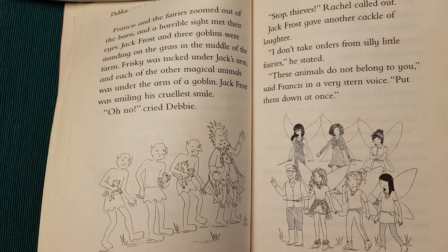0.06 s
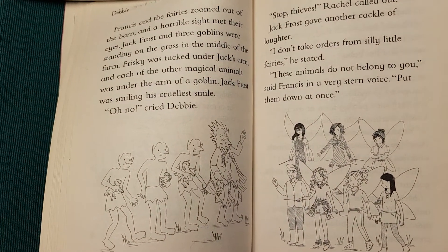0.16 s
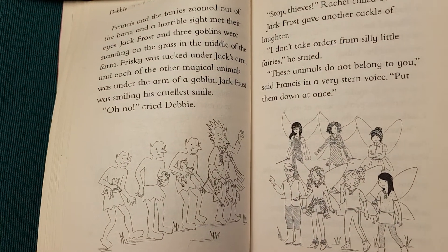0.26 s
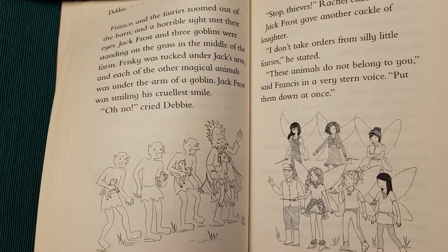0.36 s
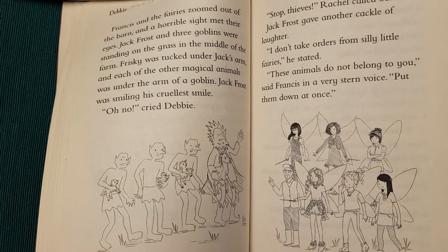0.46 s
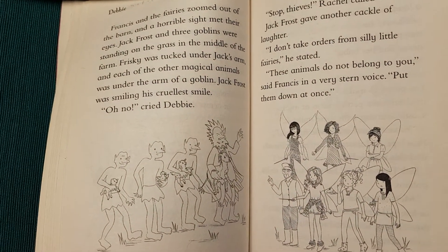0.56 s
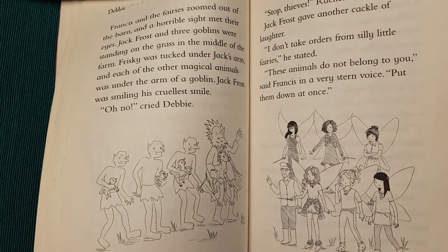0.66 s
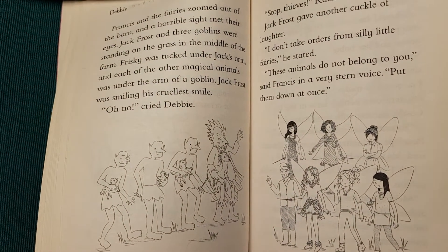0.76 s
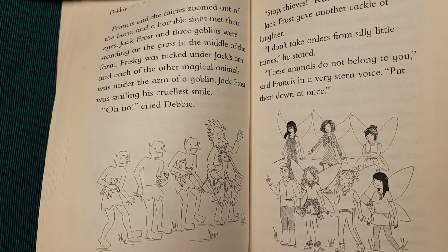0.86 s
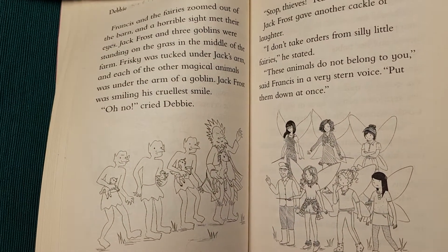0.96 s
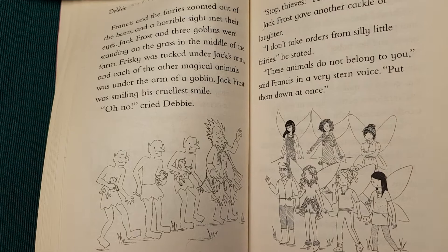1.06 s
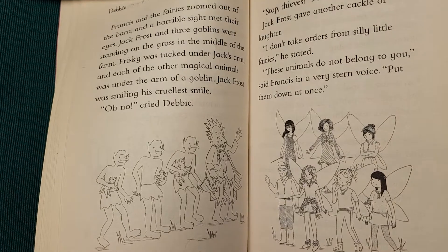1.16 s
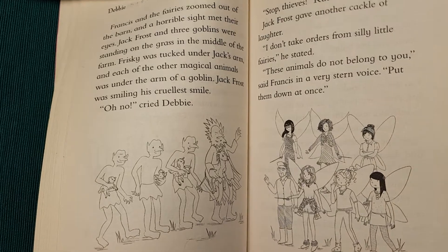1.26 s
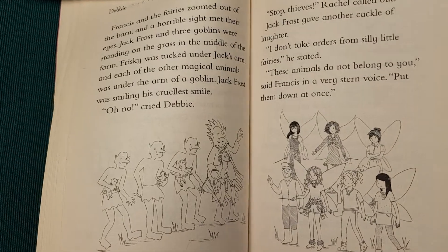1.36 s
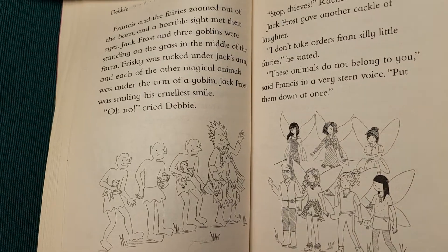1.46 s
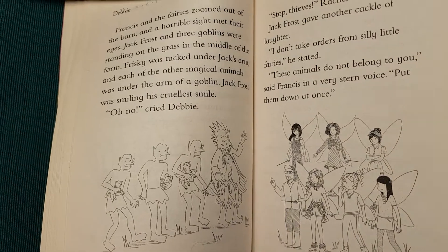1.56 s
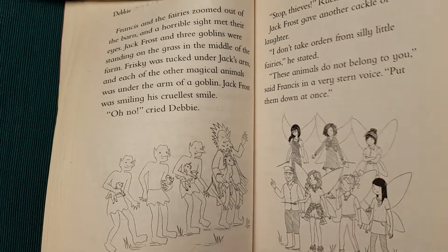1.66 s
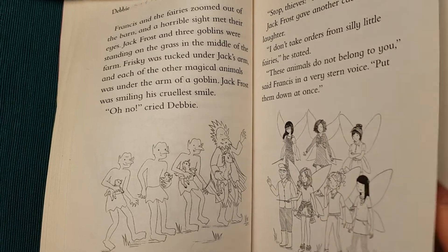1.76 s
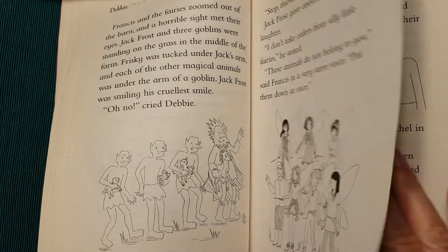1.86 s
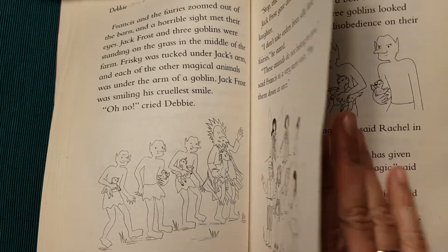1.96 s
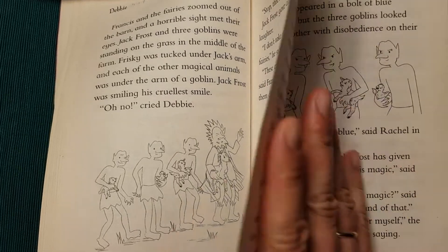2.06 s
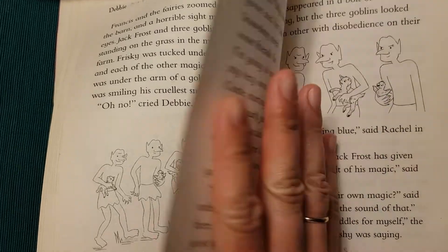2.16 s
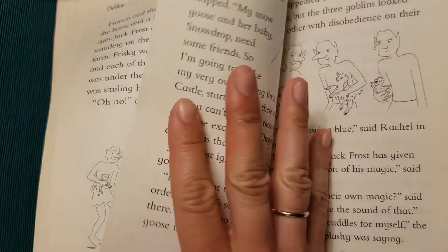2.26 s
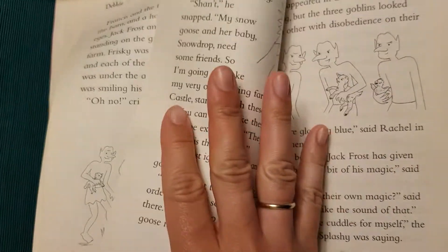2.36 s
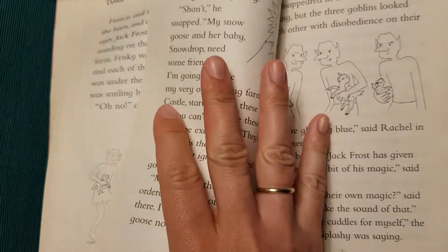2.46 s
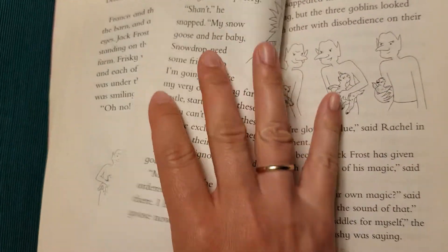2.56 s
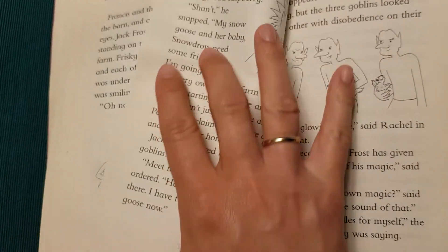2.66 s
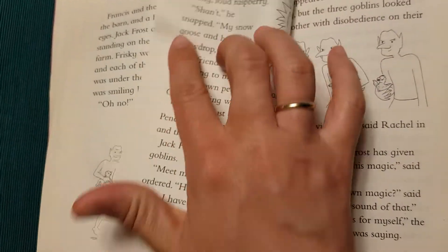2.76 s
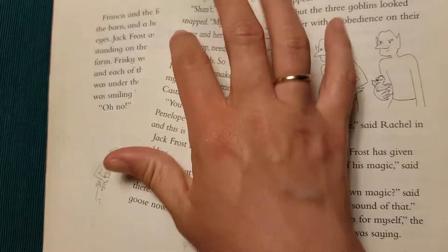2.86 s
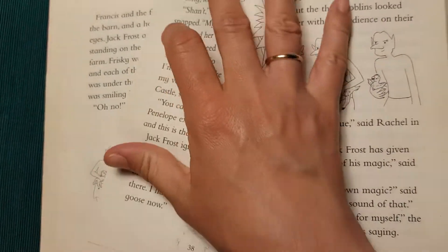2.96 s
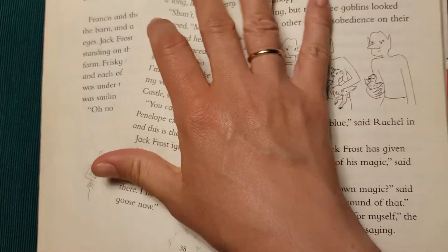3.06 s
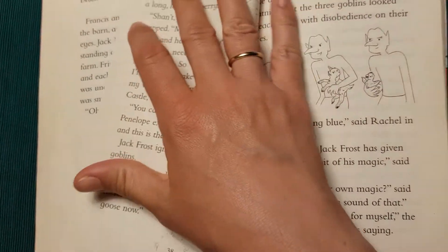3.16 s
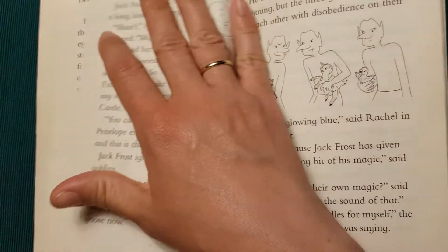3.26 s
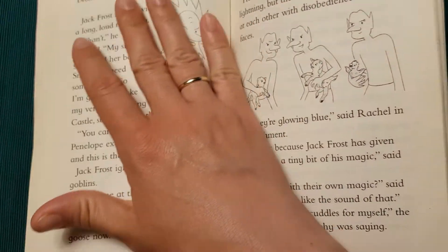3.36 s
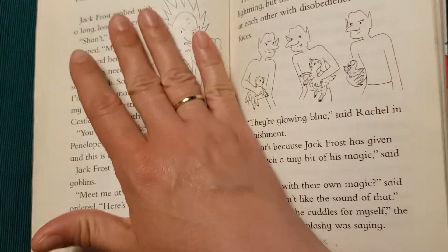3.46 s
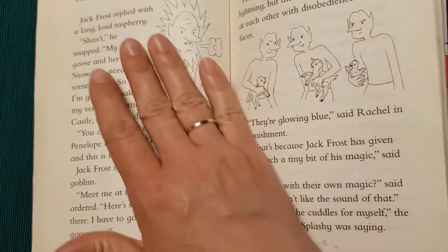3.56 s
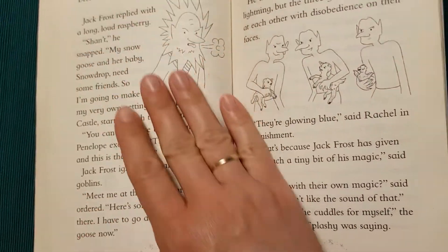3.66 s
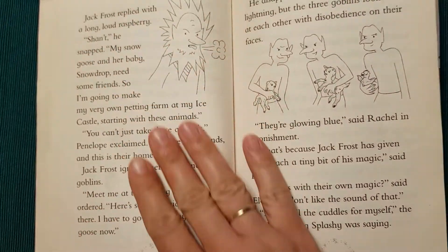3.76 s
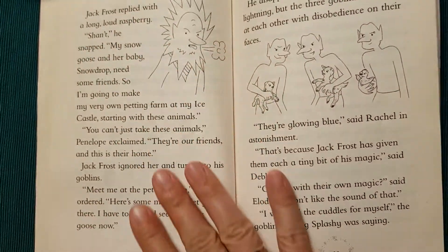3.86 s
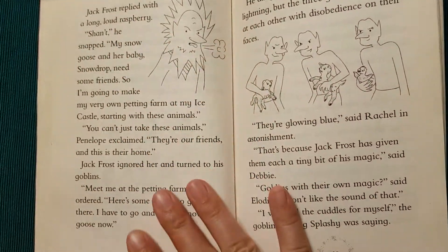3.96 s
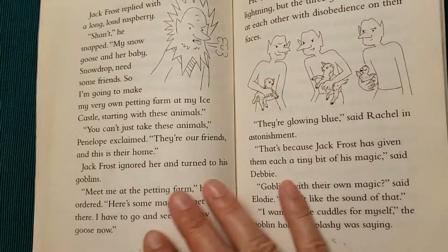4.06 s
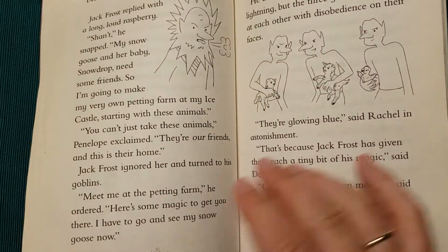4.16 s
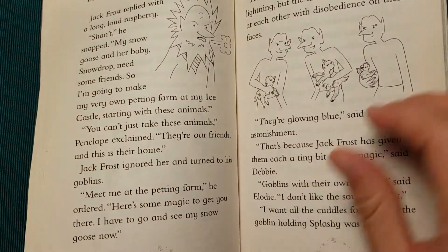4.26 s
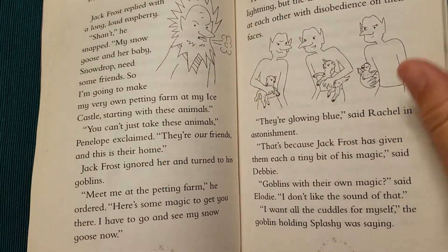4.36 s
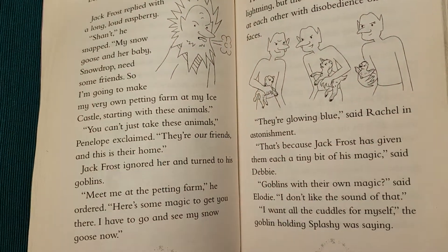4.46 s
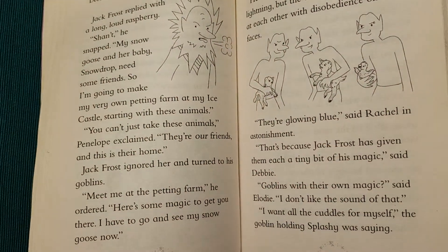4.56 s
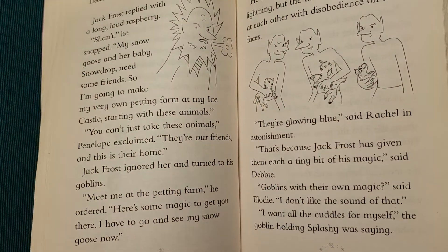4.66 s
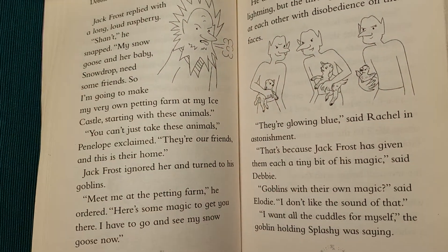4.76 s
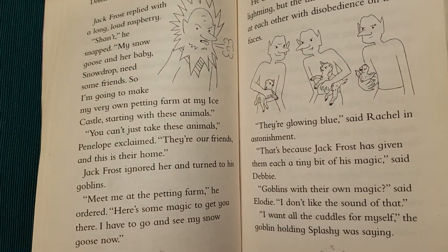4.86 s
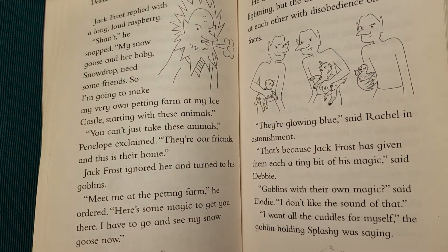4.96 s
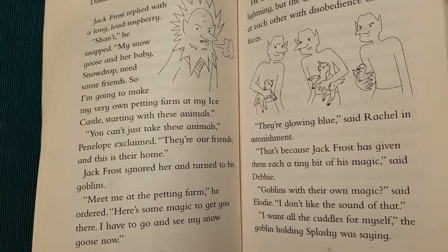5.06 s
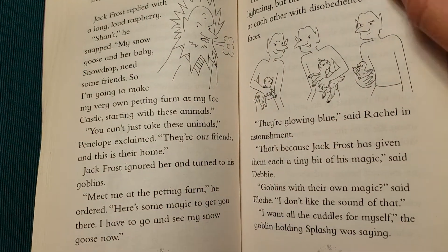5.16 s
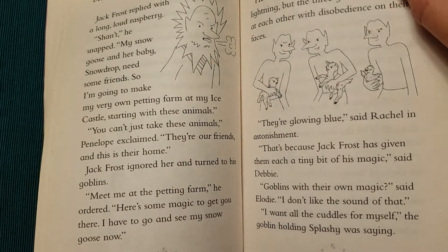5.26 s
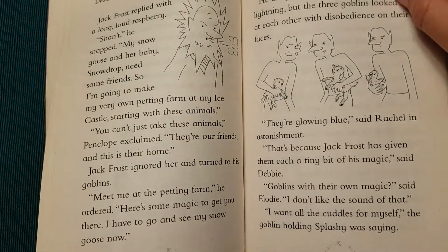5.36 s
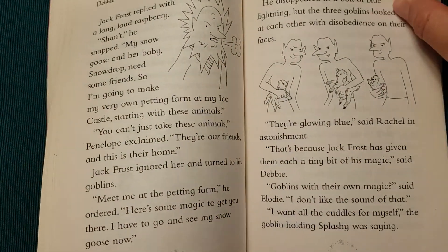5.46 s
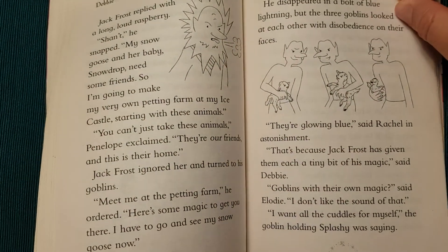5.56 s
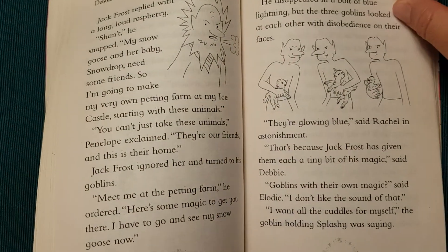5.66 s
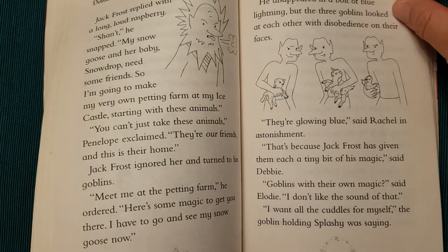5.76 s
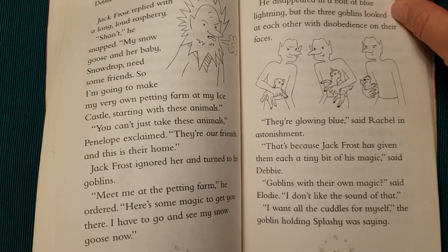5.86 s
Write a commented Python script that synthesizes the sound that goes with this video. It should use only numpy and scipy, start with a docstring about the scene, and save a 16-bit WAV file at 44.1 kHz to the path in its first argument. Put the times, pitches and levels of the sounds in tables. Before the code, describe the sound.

Close dry paper rustling: fingers scuff a page corner, flip the sheet with sharp crackles, stroke it flat, then fumble the next corner.

```python
"""Friction of a hand on a paperback page: lifted by its corner, turned, pressed down, stroked flat.
Skin hiss, fingertip scuff, sheet rustle and air-pocket whoosh are grainy noise in narrow bands.
Slips are noise bursts, snaps are ringing sheet modes, book thuds are sagging sines, the waft is
low noise. Mains hum is sines; rumble and microphone hiss are coloured noise.
Heard by a close pair of small microphones in a quiet room."""
import sys
import numpy as np
from scipy import signal
from scipy.fft import rfft, irfft
from scipy.io import wavfile

SR = 44100
rng = np.random.default_rng(int(sys.argv[2]) if len(sys.argv) > 2 else 0)


def wrap_up_sound(samples):
    """Save the sound to the file named by the first command line argument, as 16-bit audio."""
    columns = np.atleast_2d(samples).T
    # keep every value between -1 and 1, then stretch to whole-number steps
    tamed = np.clip(columns, -1, 1)
    steps = np.round(tamed * 32767).astype(np.int16)
    wavfile.write(sys.argv[1], SR, steps)


N = 260631

# separate touches at the page corner: (time of full strength [s], rise [s], hold [s], fall [s],
# rustle [dB], skin [dB], scuff [dB], air pocket [dB])
TOUCHES = [(0.092, .005, 0.004, 0.15, -66, -91, -67.5, -82),
           (0.384, 0.093, .003, 0.083, -70, -71, -66.5, -87),
           (0.443, 0.036, 0.09, 0.06, -77.5, -75, -71, -95),
           (0.737, 0.094, 0.14, 0.11, -65, -71.5, -80, -81.5), (0.8, 0.12, .003, 0.12, -58, -79, -89, -91),
           (1.296, 0.041, 0.07, 0.045, -49, -58, -51.5, -67),
           (1.395, 0.022, 0.0033, 0.01, -56, -53.5, -48, -85),
           (1.41, 0.012, 0.012, 0.027, -50, -59, -56, -65.5),
           (1.443, 0.019, 0.0024, 0.055, -50, -55, -54, -79),
           (1.462, .01, 0.0076, 0.0096, -56, -76, -73, -60),
           (1.48, 0.0077, 0.0021, 0.0063, -67, -58, -53, -76),
           (1.57, 0.024, .003, 0.11, -52.5, -58, -56, -77),
           (1.639, 0.0061, 0.0079, 0.022, -46.5, -49, -48.5, -77),
           (1.661, 0.047, .003, 0.11, -48.5, -52, -52.5, -61),
           (1.766, .01, 0.026, .05, -56.5, -60.5, -65, -72),
           (1.825, 0.039, 0.016, 0.06, -45.5, -47, -49.5, -66),
           (4.249, 0.0054, 0.043, 0.075, -62, -55.5, -63, -90),
           (4.755, 0.24, 0.0028, 0.085, -71, -60.5, -72, -78.5),
           (5.205, 0.0056, 0.023, .03, -67, -65.5, -66.5, -83.5),
           (5.225, 0.018, 0.0032, 0.033, -53.5, -56, -53, -85),
           (5.274, 0.025, 0.0024, 0.071, -47.5, -48, -50, -72),
           (5.334, 0.072, 0.037, 0.015, -55.5, -51, -55, -78),
           (5.432, 0.19, .003, 0.62, -57, -60, -66, -66.5),
           (5.509, 0.027, 0.07, 0.084, -51, -55.5, -61, -61),
           (5.64, 0.027, 0.14, 0.03, -63, -67.5, -80, -96),
           (5.74, 0.041, 0.047, 0.021, -62, -82, -72.5, -91)]
EDGE_DB = 20   # gained over a rise, lost over a fall
# hand carries the page over, presses and strokes it: (time [s], rustle [dB], skin [dB], air pocket [dB])
STROKE = [(1.86, -100, -100, -110), (1.9, -57, -56, -95), (1.926, -52.5, -53, -44),
          (2.051, -51, -50.5, -115), (2.054, -49, -48, -53), (2.13, -50.5, -49.5, -71.5),
          (2.225, -48.5, -51, -68), (2.325, -53.5, -62.5, -70), (2.355, -45, -52, -55),
          (2.415, -39.5, -46, -59), (2.464, -38, -43.5, -49.5), (2.55, -41, -43, -53),
          (2.576, -36.5, -40, -46.5), (2.604, -45.5, -51, -56), (2.684, -46.5, -51, -64),
          (2.73, -37, -47, -55.5), (2.79, -36, -45, -58), (2.834, -31, -42, -50), (2.933, -43.5, -51, -65),
          (3.033, -41, -48.5, -53.5), (3.053, -50, -51.5, -47.5), (3.073, -40, -44, -61),
          (3.193, -42.5, -46.5, -46.5), (3.362, -38, -39.5, -60), (3.402, -51.5, -51.5, -56.5),
          (3.472, -53, -52.5, -70), (3.632, -50, -44.5, -61.5), (3.71, -46.5, -45.5, -62),
          (3.831, -44.5, -42.5, -52), (3.931, -49, -47.5, -63.5), (4.041, -60, -60.5, -77),
          (4.141, -54, -50.5, -66), (4.243, -65.5, -69, -76), (4.28, -99, -110, -100)]
# scuff during the stroke: (time [s], level below skin [dB])
SCUFF_UNDER_SKIN = [(1.95, 2.8), (2.2, 5.3), (2.57, 4.4), (2.7, 4.7), (2.83, 1.9), (3.0, 3.5), (3.3, 5),
                    (3.45, 5.4), (3.65, 6.4), (3.85, 5.1), (4.15, 7.8)]
# hand at rest on the book: (rustle [dB], skin [dB], scuff [dB], air pocket [dB])
RESTING_DB = (-91.5, -83.5, -95.5, -105)
# skin hiss spectrum: (frequency [Hz], relative density [dB])
SKIN_SPECTRUM = [(5000, -46.5), (7600, -19), (9500, 1.5), (11500, -2), (13500, -6), (16000, 1.5)]
# fingertip scuff spectrum before pitch shift: (frequency [Hz], relative density [dB])
SCUFF_SPECTRUM = [(2000, -32), (3600, -19.5), (4300, 1.5), (5300, 6), (6500, -1), (8000, -3), (11000, -20)]
# scuff starts higher and settles lower: (time [s], frequency factor [1])
SCUFF_PITCH = [(0.55, 1.15), (1.2, 1.033), (4.4, 1.01), (5.2, 1)]
# sheet rustle spectrum: (frequency / centre [1], density before focus factor [dB])
RUSTLE_SPECTRUM = [(.3, -39), (.48, -10.5), (.6, -4.5), (.85, -2), (1.2, -3.5), (1.6, -5), (2.6, -22)]
# bend of the sheet moves the rustle: (time [s], centre [Hz], focus factor on the spectrum dB [1])
BEND = [(0.1, 2320, 1.1), (0.6, 2230, 1.2), (0.72, 3540, 1.9), (0.9, 3500, 2.6), (1.2, 2500, 1.6),
        (1.5, 1960, 1.05), (1.65, 3100, 1.8), (1.8, 2300, 1.65), (2.2, 2500, 0.99), (2.4, 2600, 1.34),
        (2.5, 2280, 0.83), (2.65, 1840, 0.72), (2.78, 1990, 2.66), (2.9, 2030, 2.4), (3.1, 2070, 0.71),
        (3.22, 1880, 1.12), (3.3, 2290, 1.2), (3.39, 2650, 0.69), (3.55, 2980, 1), (3.85, 2360, 2.56),
        (4.05, 2360, 1.94), (4.2, 2980, 1.4), (4.29, 2125, 0.59), (4.75, 1850, 0.85), (5.25, 2326, 1.75),
        (5.5, 2190, 1.3), (5.7, 2100, 2.9)]
# air pocket under the sheet: (frequency [Hz], relative density [dB])
POCKET_SPECTRUM = [(250, -20), (450, -21), (620, -8), (850, -1), (1050, 1.5), (1250, -11), (1600, -27.5)]
# uneven catching of the contact: (time [s], exponent on grain and factor on flicker dB [1])
CATCH = [(1.2, 1.65), (1.9, 0.82), (2.3, 0.83), (2.5, 2.05), (3.35, 1.07), (3.5, 0.7), (4.2, 0.73),
         (5.2, 0.88)]
# hand at the far corner shades the treble: (time [s], slope above 10 kHz [dB/octave])
REACH = [(4.4, -5.5), (5.1, -39.5)]
# left-right likeness of the friction: (frequency [Hz], likeness [1])
LIKENESS = [(300, 0.93), (1000, 0.83), (2000, 0.62), (4000, 0.11), (8000, 0.25), (16000, 0.19)]
# hand position: (time [s], left-right level difference before any SHADOW or lean factor [dB])
SIDEWAYS = [(0.0, 7), (1.12, 6), (2.06, 7.5), (2.45, 5.5), (2.78, 4), (3.15, 5), (3.4, 4), (3.57, 10.5),
            (3.9, 6.5), (4.1, 11.5), (4.4, 8), (5.05, 11), (5.91, 5.5)]
# (frequency [Hz], share of the left-right dB applied [1])
SHADOW = [(300, -1.5), (1000, 0.6), (2000, 1.31), (4000, 0.69), (8000, 0.5), (13000, 0.24)]
# sudden slips of fingers and flaps of the sheet: (time [s], level [dB], centre [Hz], t60 [s])
SLIPS = [(1.414, -46.5, 353, 0.26), (1.554, -47, 5500, 0.053), (1.829, -43.5, 450, 1),
         (1.92, -37.5, 495, 0.13), (2.0518, -33.5, 700, 0.047), (2.052, -26, 6500, 0.051),
         (2.343, -37, 385, 0.45), (2.461, -39, 563, 0.19), (2.593, -43, 347, 0.28),
         (2.941, -29, 293, 0.058), (5.196, -43.5, 3040, 0.052), (5.622, -37.5, 1700, 0.039)]
# buckling of the bent sheet: (time [s], level [dB], fold centre [Hz], fold width [octaves],
# factor on mode t60 [1])
SNAPS = [(0.094, -45, 3600, 1.1, 1.3), (0.899, -50, 6500, 0.48, 1.1), (1.246, -47.5, 6500, 0.84, 0.27),
         (2.0539, -37, 2970, 2.2, 0.59), (2.454, -31, 1500, 1, 1.5), (2.458, -12, 1060, 0.45, 0.78),
         (2.461, -28, 1050, 2.6, 0.32), (2.591, -19.5, 1280, 6.7, 0.43), (2.9414, -9.5, 3000, 1.01, 0.28),
         (3.1841, -18, 2600, 0.95, 2.2), (3.184, -20.5, 3800, 0.55, 0.6), (4.2484, -62, 8000, 1.4, 0.84),
         (5.1975, -50, 3500, 1.6, 0.83)]
# modes of the sheet: (frequency [Hz], relative level [dB], t60 before stretch [s])
SHEET_MODES = [(450, -7.5, 0.015), (814, -1, 0.019), (1374, 0, 0.031), (1874, 7.5, 0.0088),
               (2750, 10, 0.0069), (3985, 2, 0.005), (4860, -0.5, 0.015), (6100, 4.5, 0.0076),
               (8750, -9.5, 0.028), (12740, -13.5, .005)]
GIVE_S = 0.00035   # time constant of the fold giving way
SNAP_LEAN = 1.4   # snaps lie further to the side than the hand
# bounce off the open book cancels a band
DIP_HZ, DIP_WIDTH_HZ = 1180, 530
# more so once the page lies flat: (time [s], share cancelled [1])
FLAT = [(3.3, 0.4), (3.45, 0.73)]
# resonances of open book and space before the microphones: (frequency [Hz], width [Hz],
# mean lift before LOOSE factor [dB])
BOOK_RESONANCES = [(868, 91, -1), (1360, 190, 4.5), (1946, 100, 2), (2560, 260, 1.5), (3206, 150, 2),
                   (5150, 410, 1.5), (5900, 320, 0), (6810, 448, 3.4), (10970, 1060, 2)]
# book resonances weakest in the first touches, strongest in the last: (time [s], factor on lift [1])
LOOSE = [(1.8, 1), (2.0, 1.5), (4.4, 1.2), (5.1, 1.7)]
WANDER_DB, WANDER_HZ = 1.5, 7   # random spread of each lift, and its rate
NEAR_T60_S, NEAR_DB = .04, -17   # reflections from book, hand and table
# shifts of the book on its support: (time [s], level [dB], settled pitch [Hz], t60 [s])
THUDS = [(1.83, -47, 75.4, 0.17), (1.918, -35.5, 198, 0.026), (2.456, -40, 146, 0.08),
         (2.591, -38, 93, 0.054), (4.667, -56.5, 310, 0.11), (4.681, -27.5, 85, 0.023),
         (4.749, -57, 309, 0.2), (4.764, -33.5, 89, 0.04)]
SAG, SAG_S = 0.35, 0.0057   # share above settled pitch at the start; time constant
# air pushed by the turning page: (time [s], level [dB])
WAFT = [(1.2, -93), (1.8, -61.5), (2.2, -71.5), (2.6, -62), (3.1, -77)]
# mains lines: (frequency [Hz], mean level before pan [dB rms], waver [dB])
HUM = [(119.9, -53.5, 0.33), (238.8, -77, 2.5)]
HUM_PAN_DB, LEFT_LAG_S = -3.5, .0001
# room rumble: (frequency [Hz], relative density [dB])
RUMBLE_SPECTRUM = [(15, -29.5), (30, -8), (60, 2), (100, 2.5), (200, -5.5), (310, -8.5), (420, -28.5),
                   (700, -45.5)]
RUMBLE_DB = -64
# microphone hiss before the cutoff: (frequency [Hz], relative density [dB])
HISS_SPECTRUM = [(400, 4.5), (2000, -4), (5000, -7), (7700, -29.5), (11000, -0.5), (13000, 1.5), (16000, 4)]
HISS_DB = -68.5
CUTOFF_HZ = 15800


def amp(db):
    """dB to gain."""
    return 10 ** (np.asarray(db) / 20)


def rms_one(x):
    """Scale to rms 1."""
    return x / np.sqrt(np.mean(x ** 2) + 1e-20)


def at_hz(points, hz):
    """Read a spectrum on a log-frequency axis."""
    table = np.array(points)
    return np.interp(np.log(hz), np.log(table[:, 0]), table[:, 1])


def in_time(rows):
    """Table columns at every sample."""
    s, *columns = np.transpose(rows)
    return [np.interp(np.arange(N) / SR, s, c) for c in columns]


def drift(rate_hz):
    """Slow random curve of rms 1: noise at every 40th sample through a double one-pole low-pass."""
    r = np.exp(-80 * np.pi * rate_hz / SR)
    noise = rng.standard_normal(N // 40 + 2002)
    slow = signal.lfilter([1], [1, -2 * r, r * r], noise)[2000:]   # drop the settling
    return np.interp(np.arange(N) / 40, np.arange(len(slow)), rms_one(slow))


def pair(alike):
    """Two channels of white noise with the given likeness."""
    mid, side = rng.standard_normal((2, N))
    alike = np.clip(alike, 0, 1)
    return np.sqrt(.5 + .5 * alike) * mid + np.sqrt(.5 - .5 * alike) * side * [[1], [-1]]


def coloured(x, spectrum):
    """Steady noise given a spectrum; rms 1."""
    hz = np.maximum(np.fft.rfftfreq(N, 1 / SR), 1)
    return rms_one(irfft(rfft(x) * amp(at_hz(spectrum, hz)), N))


def placed(x, pan_db):
    """Level difference across the pair; the left microphone hears it a little later."""
    left, right = np.broadcast_to(x, (2, N))
    left = np.interp(np.arange(N) - round(LEFT_LAG_S * SR), np.arange(N), left)
    return np.array([left * amp(pan_db / 2), right * amp(-pan_db / 2)])


def shadow(hz, pan_db):
    """Left and right gains: the level difference depends on frequency."""
    return amp(at_hz(SHADOW, hz) * pan_db / 2 * np.array([[1], [-1]]))


def hand():
    """Rustle, skin, scuff and pocket levels in dB; powers of touch, stroke and rest add."""
    t = np.arange(N) / SR
    rustle_db, skin_db, pocket_db = in_time(STROKE)
    scuff_db = skin_db - in_time(SCUFF_UNDER_SKIN)[0]
    power = amp([rustle_db, skin_db, scuff_db, pocket_db]) ** 2
    power = power + amp(RESTING_DB)[:, None] ** 2
    for s, rise, hold, fall, *levels_db in TOUCHES:
        near = slice(round((s - 2 * rise) * SR), round((s + hold + 2 * fall) * SR))
        before, after = (s - t[near]) / rise, (t[near] - s - hold) / fall
        away = np.maximum(np.maximum(before, after), 0)
        power[:, near] += amp(np.array(levels_db)[:, None] - EDGE_DB * away) ** 2
    return 10 * np.log10(power)


def fibres(per_s, smooth):
    """Paper fibres catch and let go: uneven decaying clicks over a smooth part, a gain of rms 1."""
    sizes = amp(3 * np.minimum(rng.exponential(1, N), 4))
    caught = (rng.random(N) < per_s / SR) * sizes
    return rms_one(smooth + signal.lfilter([1], [1, -.97], caught))


def friction(skin_db, scuff_db, rustle_db, centre_hz, focus, pocket_db, pan_db):
    """Grainy noise in about third-octave bands; skin, scuff, sheet and pocket powers add, in patches."""
    edges = 150 * 2 ** (np.arange(21) / 2.97)
    centres, widths = np.sqrt(edges[1:] * edges[:-1]), np.diff(edges)
    shapes = [amp(at_hz(s, centres)) ** 2 for s in (SKIN_SPECTRUM, SCUFF_SPECTRUM, POCKET_SPECTRUM)]
    skin, scuff, pocket = [s / np.sum(s * widths) for s in shapes]   # unit power
    skin_power, scuff_power, pocket_power = [amp(db) ** 2 for db in (skin_db, scuff_db, pocket_db)]
    (pitch,), (slope_db,), (catch,) = in_time(SCUFF_PITCH), in_time(REACH), in_time(CATCH)
    white = rng.standard_normal((2, 2, N))   # neighbouring bands take turns
    coarse = fibres(per_s=740, smooth=3.6) ** catch
    fine = fibres(per_s=690, smooth=5.6) ** catch
    out, judder, patch = 0, .6 * drift(30), drift(8)
    for k, hz in enumerate(centres):
        band = signal.butter(3, [edges[k], edges[k + 1]], "band", fs=SR, output="sos")
        grain = coarse if hz < 6000 else fine
        mid, side = signal.sosfilt(band, white[k % 2] * grain)
        alike = np.clip(at_hz(LIKENESS, hz), -1, 1)
        stereo = np.sqrt(1 + alike) * mid + np.sqrt(1 - alike) * side * [[1], [-1]]

        rustle_shape_db = focus * at_hz(RUSTLE_SPECTRUM, hz / centre_hz)
        density = amp(rustle_db + rustle_shape_db) ** 2 / centre_hz
        shift_db = at_hz(SCUFF_SPECTRUM, hz / pitch) - at_hz(SCUFF_SPECTRUM, hz)
        density = density + skin[k] * skin_power + pocket[k] * pocket_power
        density = density + scuff[k] * scuff_power * amp(shift_db) ** 2

        patch = .6 * patch + .8 * drift(6)   # neighbouring bands swell partly together
        flicker_db = catch * (judder + 0.9 * patch)
        shade_db = slope_db * max(np.log2(hz / 10000), 0)
        gain = np.sqrt(SR / 4 * density) * amp(flicker_db + shade_db)
        out = out + gain * shadow(hz, pan_db) * stereo
    return out


def dipped(x):
    """A reflection off the book cancels part of a band."""
    b, a = signal.iirpeak(DIP_HZ, DIP_HZ / DIP_WIDTH_HZ, fs=SR)
    return x - np.clip(in_time(FLAT)[0], 0, 1) * signal.lfilter(b, a, x)


def resonant(x):
    """Each book resonance lifts its band by a randomly wandering amount."""
    loose, = in_time(LOOSE)
    for hz, width_hz, mean_db in BOOK_RESONANCES:
        b, a = signal.iirpeak(hz, hz / width_hz, fs=SR)
        lift_db = loose * mean_db + WANDER_DB * drift(WANDER_HZ)
        x = x + (amp(lift_db) - 1) * signal.lfilter(b, a, x)
    return x


def slips():
    """Each slip is a wide noise burst round its centre, starting at once and dying away."""
    out, noise = np.zeros((2, N)), pair(0.47) * fibres(per_s=430, smooth=0.5)
    for s, level_db, hz, t60 in SLIPS:
        at = round(s * SR)
        t = np.arange(min(SR // 4, N - at)) / SR
        here = slice(at, at + len(t))
        limits_hz = [hz / 3.2, min(hz * 4.8, .45 * SR)]
        band = signal.butter(2, limits_hz, "band", fs=SR, output="sos")
        burst = rms_one(signal.sosfilt(band, noise[:, here]))
        out[:, here] += burst * amp(level_db - 10.5 - 60 * t / t60)
    return out


def ring(clicks, hz, t60):
    """Two-pole resonator: a unit click starts a decaying sine of height 1."""
    r, w = amp(-60 / (t60 * SR)), 2 * np.pi * hz / SR
    return signal.lfilter([0, np.sin(w)], [1, -2 * r * np.cos(w), r * r], clicks + 1e-18)


def snaps(pan_db):
    """A buckling fold kicks the sheet modes that lie near its own size of bend."""
    out, kick = np.zeros((2, N)), np.arange(SR // 10) == 0
    giving = 1 - np.exp(-np.arange(len(kick)) / SR / GIVE_S)
    for s, level_db, fold_hz, octaves, stretch in SNAPS:
        at, rings = round(s * SR), 0
        for k, (hz, mode_db, t60) in enumerate(SHEET_MODES):
            off_fold = np.log2(hz / fold_hz) / octaves
            kicked_db = mode_db + 1.4 * rng.standard_normal() - 4.1 * off_fold ** 2
            mode = amp(kicked_db) * ring(kick, hz, t60 * stretch) * (-1) ** k
            rings = rings + mode * shadow(hz, pan_db[at])
        snap = giving * rings
        out[:, at:][:, :len(kick)] += amp(level_db) * snap / np.max(np.abs(snap.mean(axis=0)))
    return out


def surroundings(x, wet_db, count):
    """Short swarms of reflections at each microphone ripple the spectrum; several trade places in time."""
    t, wet = np.arange(SR // 10) / SR, 0
    for k in range(count):
        swarm = rng.standard_normal((2, len(t))) * amp(-60 * t / NEAR_T60_S) * (t > .0006)
        swarm = signal.lfilter([1], [1, -.6], swarm)   # paper and cloth soak up the treble
        swarm = amp(wet_db) * swarm / np.sqrt(np.sum(swarm ** 2, axis=1, keepdims=True))
        share = 1
        if count > 1:
            share = np.sqrt(2 / count) * np.cos(np.pi * (np.arange(N) / SR + k / count))
        wet = wet + signal.fftconvolve(x * share, swarm, axes=1)[:, :N]
    return (x + wet) / np.sqrt(1 + amp(wet_db) ** 2)


def thuds():
    """Book shifts: low sines that rise over a few milliseconds, sag in pitch and decay."""
    out, t = np.zeros(N), np.arange(SR // 3) / SR
    sagged_s = t + SAG * SAG_S * (1 - np.exp(-t / SAG_S))   # integral of the pitch factor
    for s, level_db, hz, t60 in THUDS:
        envelope = amp(level_db - 60 * t / t60) * (1 - np.exp(-t / .004))
        out[round(s * SR):][:len(t)] += envelope * np.sin(2 * np.pi * hz * sagged_s)
    return out


def waft():
    """Slow puffs of air on the microphones: low band noise."""
    level_db, = in_time(WAFT)
    band = signal.butter(2, [38, 85], "band", fs=SR, output="sos")
    return amp(level_db) * rms_one(signal.sosfilt(band, pair(.8)))


def hum():
    """Mains lines: sines that waver in level."""
    t, out = np.arange(N) / SR, 0
    for hz, db, waver_db in HUM:
        level = np.sqrt(2) * amp(db + waver_db * drift(5.2))
        out = out + level * np.sin(2 * np.pi * (hz * t + rng.random()))
    return out


def rumble():
    """Steady low coloured noise of the room."""
    return amp(RUMBLE_DB) * coloured(pair(0.45), RUMBLE_SPECTRUM)


def scene():
    """Paper, book and room at the two microphones."""
    (pan_db,), (centre_hz, focus) = in_time(SIDEWAYS), in_time(BEND)
    rustle_db, skin_db, scuff_db, pocket_db = hand()
    rubbing = friction(skin_db, scuff_db, rustle_db, centre_hz, focus, pocket_db, pan_db)
    rubbing = placed(resonant(dipped(rubbing)), 0) + placed(slips(), pan_db)
    snapping = placed(snaps(SNAP_LEAN * pan_db), 0)
    paper = surroundings(rubbing, NEAR_DB, count=4)
    paper = paper + surroundings(snapping, NEAR_DB + 4.0, count=1)
    return paper + thuds() + waft() + placed(hum(), HUM_PAN_DB) + rumble()


def record(dry):
    """The microphones add their own hiss; a steep low-pass cuts the top."""
    hiss = amp(HISS_DB) * coloured(pair(0.041), HISS_SPECTRUM)
    return signal.sosfilt(signal.ellip(12, .5, 70, CUTOFF_HZ, fs=SR, output="sos"), dry + hiss)


dry = scene()
out = record(dry)
wrap_up_sound(out)
```